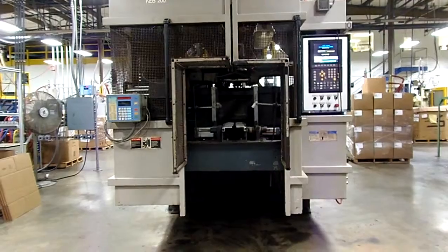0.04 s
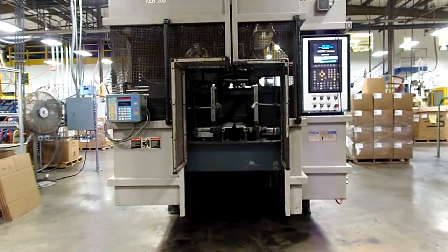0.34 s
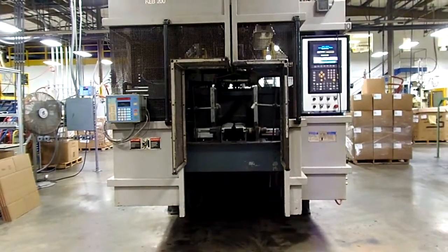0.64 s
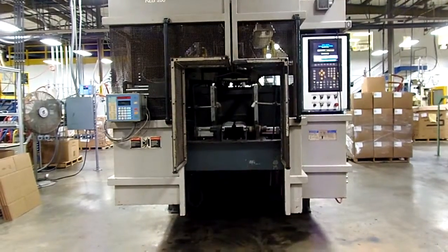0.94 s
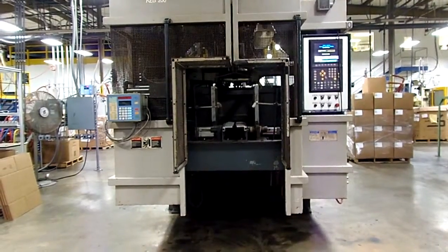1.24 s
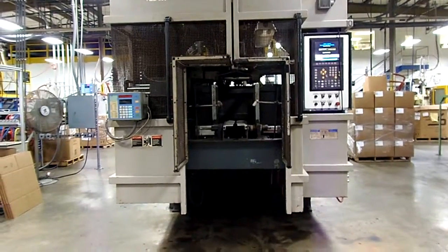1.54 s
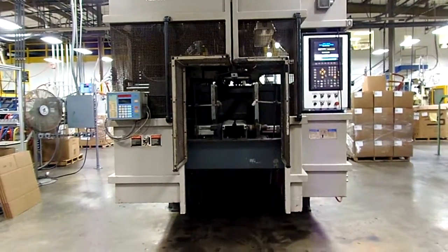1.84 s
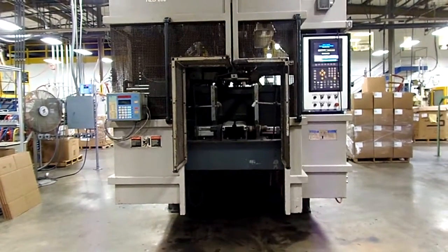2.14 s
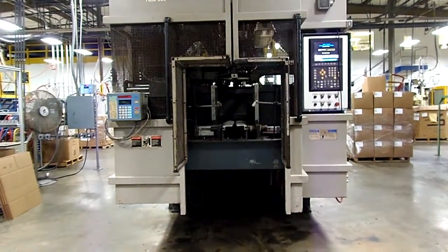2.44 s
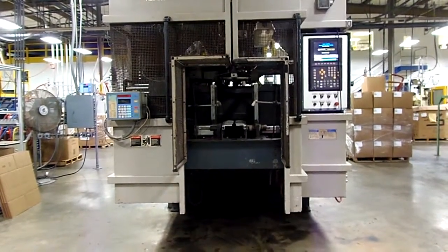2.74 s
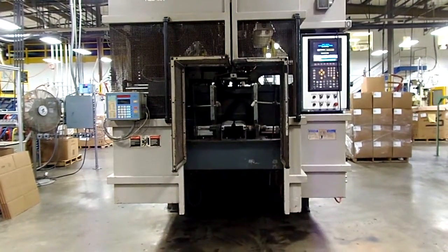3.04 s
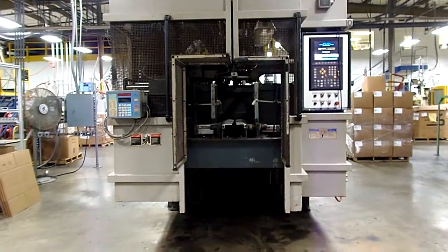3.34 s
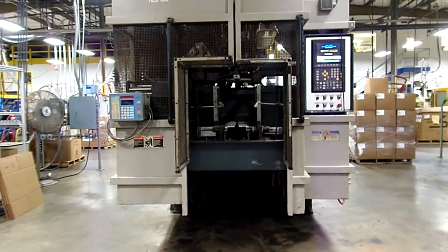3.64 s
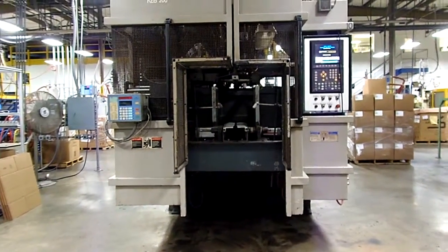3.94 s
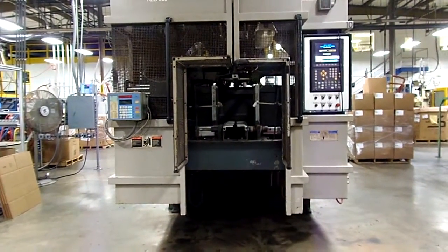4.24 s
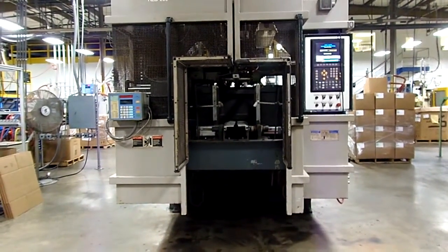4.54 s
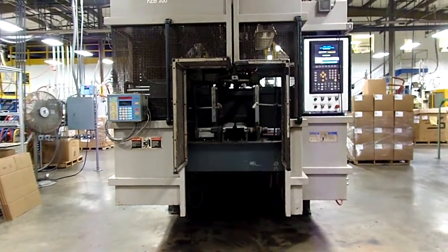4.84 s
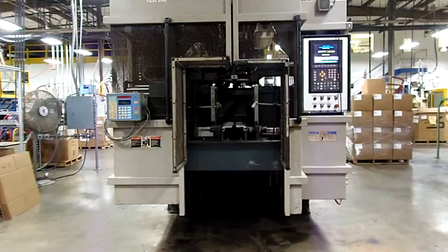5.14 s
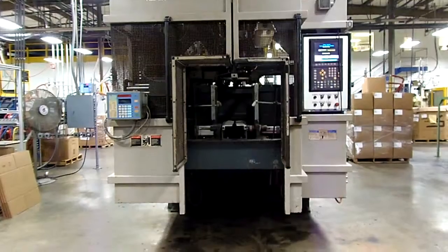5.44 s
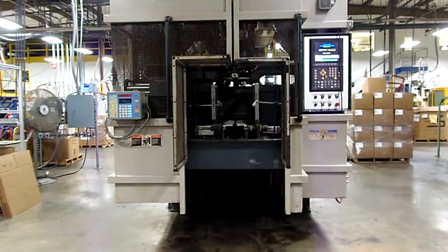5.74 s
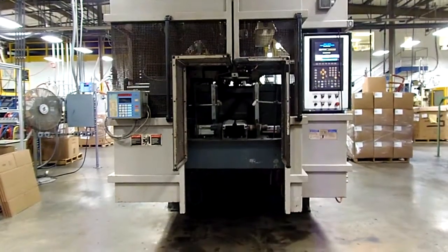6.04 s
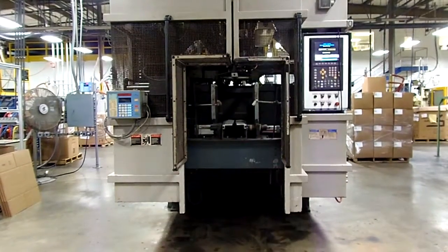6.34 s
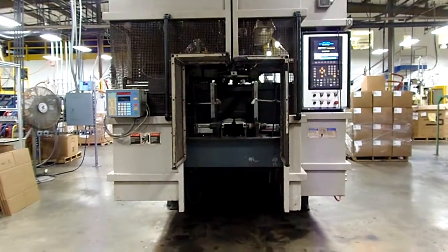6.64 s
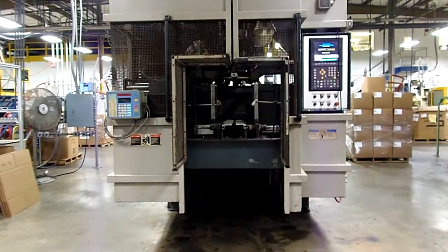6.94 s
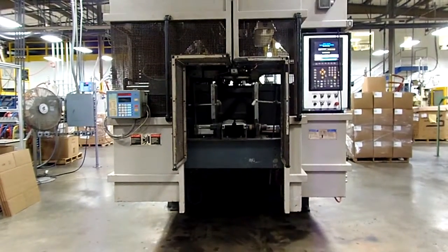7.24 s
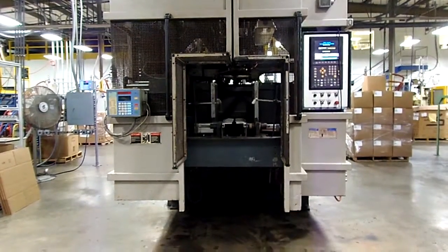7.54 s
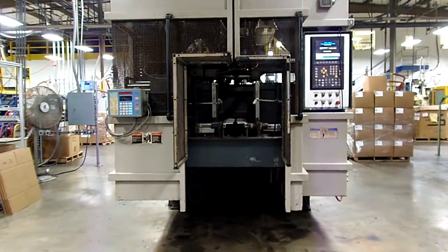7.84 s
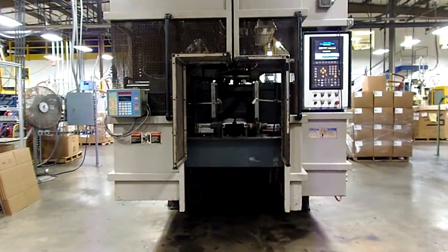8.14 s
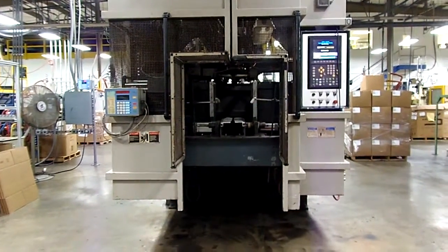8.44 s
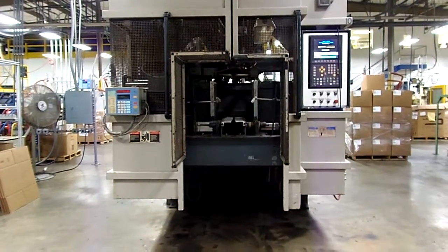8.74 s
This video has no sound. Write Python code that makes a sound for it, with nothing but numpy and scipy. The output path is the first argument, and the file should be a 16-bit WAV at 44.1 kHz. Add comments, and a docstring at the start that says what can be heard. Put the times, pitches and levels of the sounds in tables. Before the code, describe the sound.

A plastics moulding machine hums in a roaring factory hall under a light air hiss. After about a second a valve spits and a loud, bright hiss takes over, growing stronger midway and pushing the hum down. Near the end the air shuts off, the hum swells back, a hydraulic pump whines and the steel mould clacks open with short puffs. The mono microphone has automatic gain.

```python
"""Blow moulding machine in a factory hall

Motors hum and the hall roars. Air valves open one after another, and the turbulent hiss of their jets
drives down the automatic gain of a mono microphone, and the hum with it. When the air shuts off the hum
swells back and the hydraulic pump whines under load. Oil rushes, the mould clacks open, ringing the
resonant modes of its steel frame, and valves puff."""
import sys
import numpy as np
from scipy import signal
from scipy.fft import rfft, irfft, next_fast_len
from scipy.io import wavfile
from scipy.ndimage import uniform_filter1d, minimum_filter1d

SR = 44100
rng = np.random.default_rng(int(sys.argv[2]) if len(sys.argv) > 2 else 0)


def transcribe(signal):
    """Save signal, clipped to [-1, 1], as a 16-bit WAV file at the path in sys.argv[1]."""
    frames = np.atleast_2d(signal).T
    limited = np.clip(frames, -1, 1)
    pcm = np.round(limited * 32767).astype(np.int16)
    wavfile.write(sys.argv[1], SR, pcm)


N = 392049
TIME = np.arange(N) / SR

# Noise spectra. Each row: frequency in Hz, relative spectral density in dB.
ROAR_COLOUR = [(20, -14), (50, -13), (80, -0.5), (100, -8), (125, 0), (190, -5), (260, -8.5), (360, -14),
               (480, -15), (600, -11), (700, -15.5), (1000, -18), (2200, -18), (3000, -22), (7860, -24.5),
               (15800, -37)]
DRAUGHT_COLOUR = [(8, -20), (22, 3), (42, 6.5), (60, -13), (200, -38), (2000, -80)]
COOLING_COLOUR = [(500, -27), (2000, -8), (3500, -5.5), (5000, -1.5), (7000, 0), (8500, -3.5), (10000, 0),
                  (12500, -4.5), (14000, 0.5), (15800, -3.5)]
EXHAUST_COLOUR = [(400, -36), (1500, -17.5), (3000, -11), (4200, -5), (5300, -0.5), (7200, -0.5),
                  (8600, -1), (11000, -2), (14000, -6.5), (15800, -10.5)]
BLOW_COLOUR = [(200, -24.5), (800, -15), (2000, -12), (3500, -8), (5000, -2.5), (7000, 0.5), (10000, 1.5),
               (12500, -0.5), (14200, 2.5), (15800, -6.5)]
SPIT_COLOUR = [(60, -2), (200, 2), (400, 0), (1000, -8), (3000, -12), (8000, -11), (15000, -19)]
THUD_COLOUR = [(40, 8), (100, 7), (350, -9), (700, -9.5), (3000, -35), (10000, -45)]
OIL_COLOUR = [(300, -18), (2000, -12), (3200, -2), (4500, 4), (6500, -0.5), (9000, -17.5), (12000, -8.5),
              (15800, -16)]
PUFF_COLOUR = [(1000, 0), (4500, 0), (9000, -4), (13000, -11), (15800, -6)]
# Strength of the draught's rumble. Each row: time in seconds, level in dB.
DRAUGHT_LEVEL = [(0.8, -33), (2, -31), (7.7, -31.5), (8.3, -39)]
# Motor and mains tones. Each row: frequency in Hz, rms level in dB.
HUM_TONES = [(70.5, -38), (120, -37.5), (140, -29.8), (143.4, -39), (210, -40.5), (280, -42), (420, -44.5),
             (586, -47.5), (704, -52), (1343, -53.5)]
# The pump's main tone and upper tones. Each row: frequency in Hz, rms level under load in dB.
PUMP_TONE = [(537.5, -38.3)]
PUMP_WHINE = [(1343, -44.5), (1365, -51), (2099, -53), (2367, -47), (2379, -47), (4328, -47), (4904, -51)]
# Air valve openings. Each row: start in seconds, duration in seconds, level in dB,
# change of level in dB per second, jet fed.
VALVES = [(-0.1, 1.35, -16.8, 0.24, "cooling"), (1.125, 0.11, -23, 0, "exhaust"),
          (1.231, 5.97, -8, 0.4, "blow"), (1.25, 5.95, -10, -2.5, "cooling"),
          (3.014, 0.032, -6.3, -0.5, "exhaust"), (3.342, 0.058, -6, 0, "exhaust"),
          (3.58, 3.62, -4.6, 0.25, "exhaust")]
# Slow swing of the pressure behind the exhaust jet. Each row: time in seconds, gain in dB.
EXHAUST_PRESSURE = [(3.6, -1), (3.9, 0.7), (4.8, -0.5), (5.3, 1.5), (5.95, -2.8), (6.3, -0.2)]
# Spits of the opening blow valve, and later valve puffs. Each row: start in seconds, level in dB.
SPITS = [(1.238, -10.5), (1.25, -8.5), (1.259, -9), (1.265, -11.5)]
PUFFS = [(7.823, -20), (7.866, -20.5)]
# Carriage knocks. Each row: start in seconds, level in dB, decay time constant in seconds.
THUDS = [(2.326, -17.5, 0.032), (2.39, -27, 0.2), (8.075, -23, 0.09)]
# Mould and clamp contacts. Each row: start in seconds, level in dB, most excited frequency in Hz.
CLACKS = [(7.64, -1, 5600), (7.645, -6, 3500), (7.663, -4, 2200), (7.67, -12, 6000), (7.715, -5.5, 2800),
          (7.723, -6.5, 3400), (7.743, -12, 5000), (8.125, -9, 2600), (8.745, -3.5, 1340)]
# Resonances of the clamp frame. Each row: frequency in Hz, bandwidth in Hz, gain in dB.
FRAME_MODES = [(1340, 60, 1), (2020, 350, -2.5), (2420, 200, -3), (2754, 90, 1.5), (2950, 90, -4),
               (4030, 890, -8), (5040, 150, -2.5), (5610, 150, 0), (6000, 180, -3), (6800, 500, -7.5),
               (8930, 400, -7.5), (12600, 4500, -16)]
# Reverberation of the hall. Each row: frequency in Hz, time to decay by 60 dB in seconds.
HALL_T60 = [(500, 0.66), (2000, 0.64), (5000, 1.1), (9000, 0.78), (15000, 0.48)]

BLOW_S, LOAD_S = 1.23, 7.1  # air surges into the mould; the pump takes up load
TRAVEL_S, TRAVEL_RISE_S = 7.63, 0.06  # the clamp gets moving


def from_db(db):
    """Amplitude ratio for a level in decibels."""
    return np.exp(np.asarray(db) * (np.log(10) / 20))


def rms_one(x):
    """Normalisation to unit rms."""
    return x / np.sqrt(np.mean(x ** 2) + 1e-20)


def level(rows):
    """Gain interpolated between rows of time in seconds and level in dB."""
    return from_db(np.interp(TIME, *np.transpose(rows)))


def at_hz(points, hz):
    """Interpolation on a logarithmic frequency axis."""
    centres, values = np.transpose(points)
    return np.interp(np.log(hz + 1), np.log(centres), values)


def ramp(start, rise):
    """Linear rise from 0 to 1, then held."""
    return np.clip((TIME - start) / rise, 0, 1)


def burst(start, db, decay):
    """Sudden onset followed by exponential decay."""
    out = np.zeros(N)
    first, last = np.searchsorted(TIME, [start, start + 10 * decay])
    out[first:last] = from_db(db) * np.exp((start - TIME[first:last]) / decay)
    return out


def noise(colour):
    """Spectrally shaped Gaussian noise of unit rms."""
    size = next_fast_len(N, real=True)
    hz = np.fft.rfftfreq(size, 1 / SR)
    spectrum = rfft(rng.standard_normal(size)) * from_db(at_hz(colour, hz))
    return rms_one(irfft(spectrum, size)[:N])


def drift(rate_hz):
    """Low-pass filtered noise: a slow wander of unit rms."""
    r = np.exp(-200 * np.pi * rate_hz / SR)
    white = rng.standard_normal(N // 100 + 1002)  # one value per 100 samples
    slow = rms_one(signal.lfilter([1], [1, -2 * r, r * r], white)[1000:])
    return np.interp(np.arange(N) / 100, np.arange(len(slow)), slow)


def tones(lines, waver_db, wander_hz, rate_hz):
    """Sinusoids under slight random amplitude and frequency modulation."""
    out = 0
    for hz, db in lines:
        cycles = np.cumsum(hz + wander_hz * drift(rate_hz)) / SR + rng.random()
        amplitude = np.sqrt(2) * from_db(db + waver_db * drift(rate_hz))
        out = out + amplitude * np.sin(2 * np.pi * cycles)
    return out


def hall_roar(rest_db, strain_db, ease_s):
    """Broadband noise swells as the clamp starts moving, over a draught's deep rumble."""
    strain = ramp(TRAVEL_S, TRAVEL_RISE_S) * np.exp(-np.maximum(TIME - TRAVEL_S, 0) / ease_s)
    roar = noise(ROAR_COLOUR) * from_db(rest_db + strain_db * strain + 0.42 * drift(8.7))
    return roar + level(DRAUGHT_LEVEL) * noise(DRAUGHT_COLOUR)


def motors():
    """Motor and mains tones superpose; two motors near 140 Hz beat at their difference frequency."""
    return tones(HUM_TONES, waver_db=1.74, wander_hz=1.2, rate_hz=4.93)


def pump(idle_db):
    """The hydraulic pump's tones grow in amplitude with its load as the air shuts off."""
    load = ramp(LOAD_S, rise=0.35)
    main = tones(PUMP_TONE, waver_db=2.5, wander_hz=0.74, rate_hz=3.51)
    whine = tones(PUMP_WHINE, waver_db=1.7, wander_hz=4.0, rate_hz=10.906)
    return from_db(idle_db * (1 - load)) * (main + whine)


def jet(name, colour, flutter_db, rise_s=0.027, decay_s=0.031):
    """Turbulent jet noise flutters with the pressure and decays exponentially when its valve shuts."""
    flow = 0
    for opens, length, db, db_per_s, fed in VALVES:
        if fed == name:
            held = from_db(db + db_per_s * np.clip(TIME - opens, 0, length))
            shut = np.exp(-np.clip((TIME - opens - length) / decay_s, 0, 20))
            flow = flow + ramp(opens, rise_s) * held * shut
    return flow * noise(colour) * from_db(flutter_db * drift(16))


def air_jets(surge_db, settle_s):
    """Three jets add incoherently; blow air surges into the empty mould until back pressure builds."""
    surge = from_db(surge_db * np.exp(-np.maximum(TIME - BLOW_S, 0) / settle_s))
    cooling = jet("cooling", COOLING_COLOUR, flutter_db=0.23)
    blow = jet("blow", BLOW_COLOUR, flutter_db=0.33) * surge
    exhaust = jet("exhaust", EXHAUST_COLOUR, flutter_db=0.45) * level(EXHAUST_PRESSURE)
    return cooling + blow + exhaust


def valve_bursts(events, colour, decay_s):
    """A switching valve releases short transients of turbulent noise."""
    return noise(colour) * sum(burst(start, db, decay_s) for start, db in events)


def carriage_thuds():
    """Dull impacts: low-frequency noise under exponential decay."""
    return noise(THUD_COLOUR) * sum(burst(*thud) for thud in THUDS)


def oil_rush(db):
    """Turbulent oil hisses through the clamp's valves as it travels."""
    return ramp(TRAVEL_S, TRAVEL_RISE_S) * noise(OIL_COLOUR) * from_db(db + 0.49 * drift(22))


def clamp_clacks(contact_s, db_per_octave):
    """Gritty contacts excite the steel frame's damped modes, each most near its favoured frequency."""
    grit = rng.standard_normal(N)
    forces = np.array([grit * burst(start, db, contact_s) for start, db, _ in CLACKS])
    favoured_hz = np.array(CLACKS)[:, 2]
    out = 0
    for k, (hz, width, db) in enumerate(FRAME_MODES):
        octaves_away = np.abs(np.log2(hz / favoured_hz))
        force = from_db(db - db_per_octave * octaves_away) @ forces + 1e-18
        r = np.exp(-np.pi * width / SR)
        ring = signal.lfilter([1, 0, -1], [1, -2 * r * np.cos(2 * np.pi * hz / SR), r * r], force)
        out = out + (-1) ** k * (1 - r * r) / 2 * ring  # modes alternate in polarity
    return out


def guard_reflections(x, echo_db, t60_s):
    """Early reflections inside the guards interfere with the direct sound, giving a piped colour."""
    echoes = rng.standard_normal(SR // 2) * from_db(-60 * TIME[:SR // 2] / t60_s)
    response = from_db(echo_db) * echoes / np.linalg.norm(echoes)
    response[0] = 1  # direct path
    return signal.fftconvolve(x, response / np.linalg.norm(response))[:N]


def hall_reverb(x, wet_db):
    """Energy in a diffuse field decays exponentially in each band, fastest in the highest treble."""
    out, edges_hz = 0, [250, 700, 1500, 2800, 4200, 6000, 8000, 10300, 13000, 16000]
    for low, high in zip(edges_hz, edges_hz[1:]):
        band = signal.butter(2, [low, high], "band", fs=SR, output="sos")
        steep = np.vstack([band, band])
        retained = from_db(-120 / SR / at_hz(HALL_T60, np.sqrt(low * high)))
        energy = signal.lfilter([1 - retained], [1, -retained], signal.sosfilt(steep, x) ** 2)
        wash = rms_one(signal.sosfilt(steep, rng.standard_normal(N)))
        out = out + np.sqrt(energy) * wash
    return from_db(wet_db) * out


def scene():
    """Sources and reverberation superpose, the same in both channels."""
    air = air_jets(surge_db=14.5, settle_s=0.056)
    spits = valve_bursts(SPITS, SPIT_COLOUR, decay_s=0.0055)
    puffs = valve_bursts(PUFFS, PUFF_COLOUR, decay_s=0.027)
    impacts = clamp_clacks(contact_s=0.0098, db_per_octave=4.5) + carriage_thuds()
    near = guard_reflections(air + spits + puffs + impacts, echo_db=-8.0, t60_s=0.13)
    roar = hall_roar(rest_db=-25.4, strain_db=3.5, ease_s=0.55)
    machinery = roar + motors() + pump(idle_db=-16) + oil_rush(db=-34)
    mono = machinery + near + hall_reverb(near, wet_db=-5.0)
    return np.array([mono, mono])


def gain_control(x, target_db, start_db, attack_s, hold_s, release_s, sense_hz):
    """Compression: loud sound above sense_hz lowers the gain fast; it holds, then recovers slowly."""
    step = 64  # samples per gain update
    sensed = signal.sosfilt(signal.butter(1, sense_hz, "high", fs=SR, output="sos"), x[0])
    power = uniform_filter1d(sensed ** 2, size=512)[::step]
    wanted = np.minimum(1, from_db(target_db) / np.sqrt(power + 1e-12))
    hold = int(hold_s * SR / step) + 1
    gain, gains = from_db(start_db), []
    for aim in minimum_filter1d(wanted, size=hold, origin=(hold - 1) // 2).tolist():
        gain += (aim - gain) * step / SR / (attack_s if aim < gain else release_s)
        gains.append(gain)
    return x * np.interp(np.arange(N) / step, np.arange(len(gains)), gains)


def record(dry):
    """The microphone applies automatic gain, a narrow treble notch and a steep low-pass filter."""
    out = gain_control(dry, target_db=-24.0, start_db=-11.0,
                       attack_s=0.055, hold_s=0.077, release_s=0.6, sense_hz=400.6)
    out = signal.lfilter(*signal.iirnotch(7800, Q=17, fs=SR), out)
    return signal.sosfilt(signal.ellip(12, .1, 80, 15800, fs=SR, output="sos"), out)


dry = scene()
out = record(dry)
transcribe(out)
```